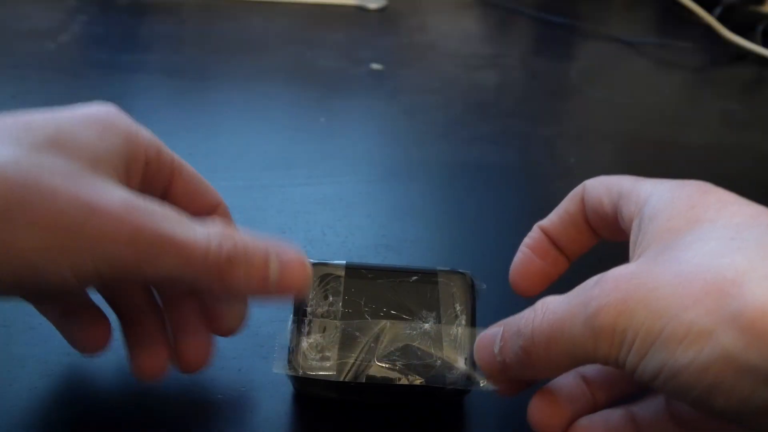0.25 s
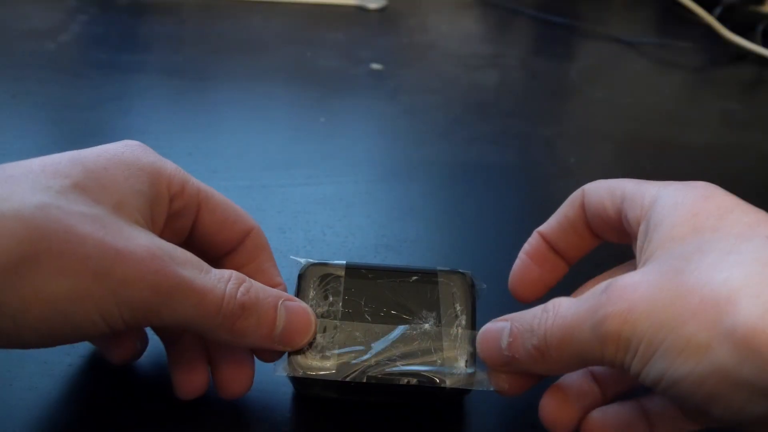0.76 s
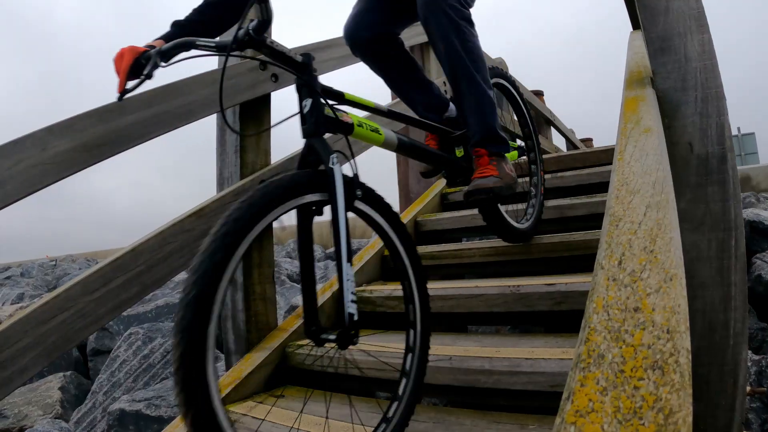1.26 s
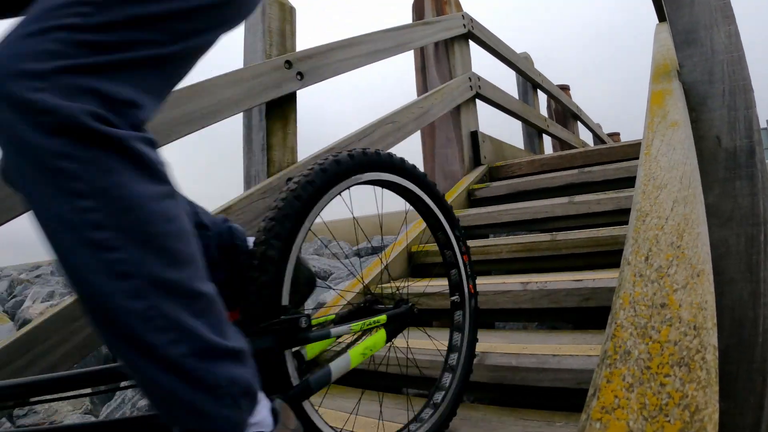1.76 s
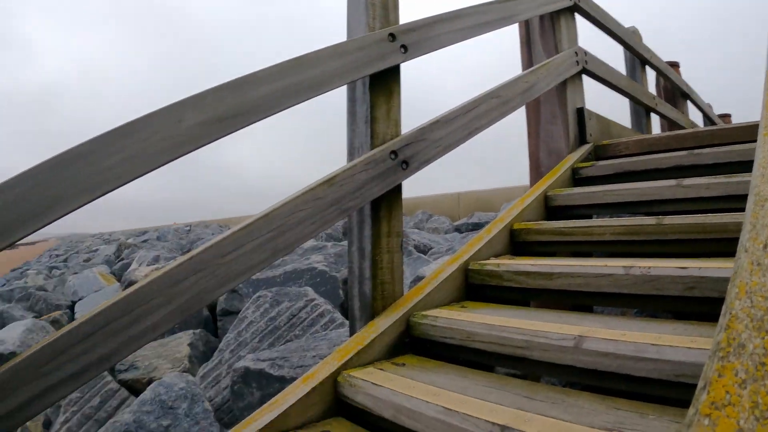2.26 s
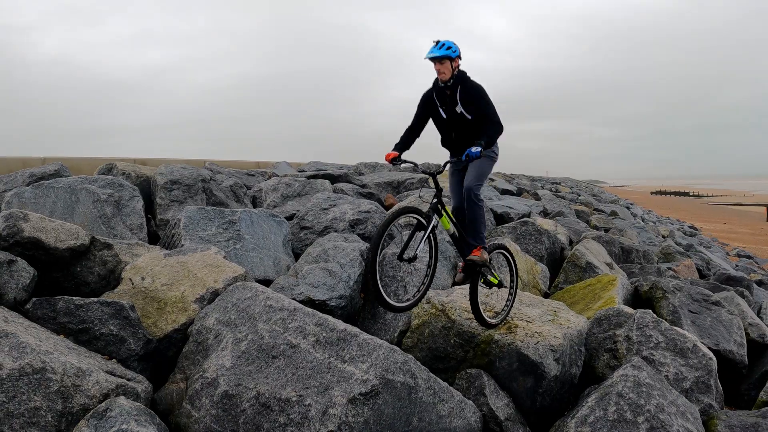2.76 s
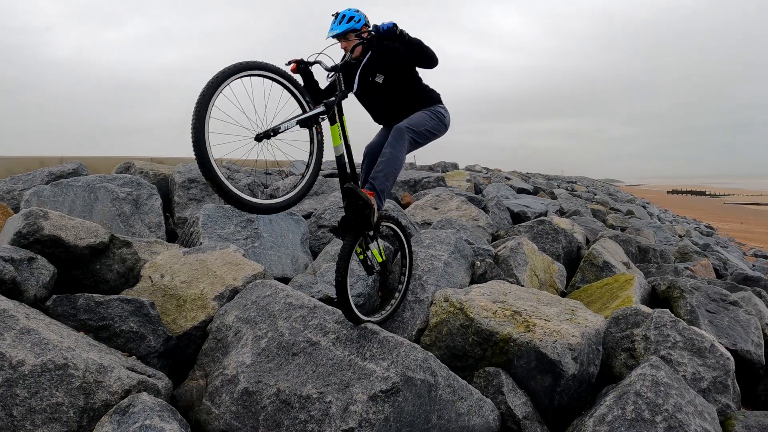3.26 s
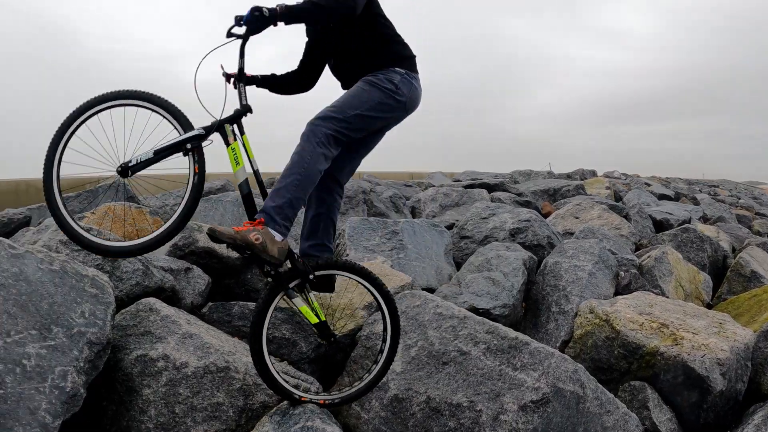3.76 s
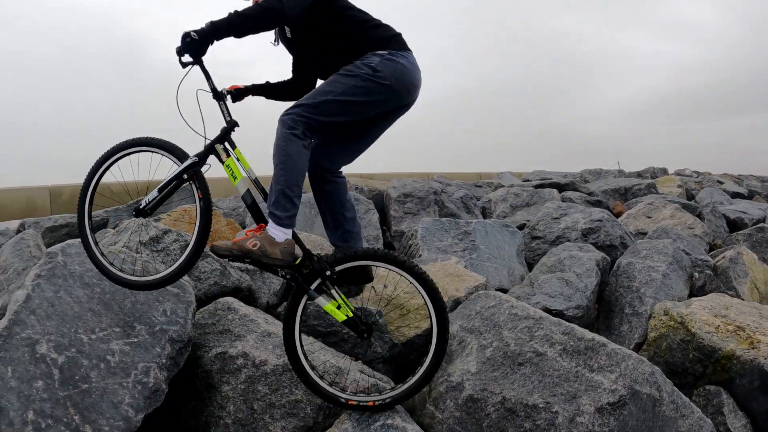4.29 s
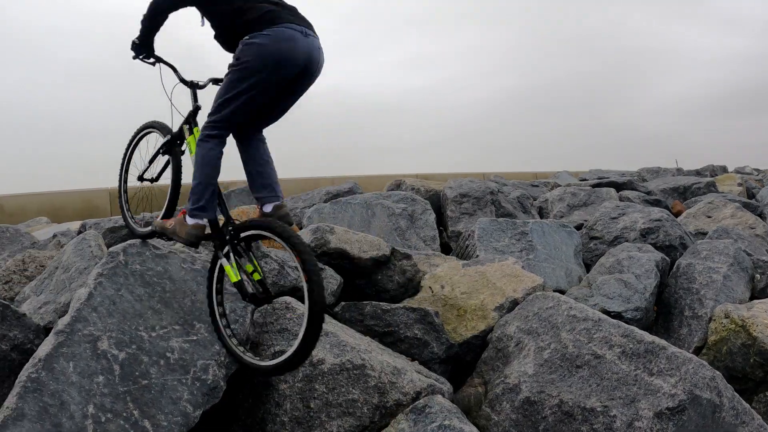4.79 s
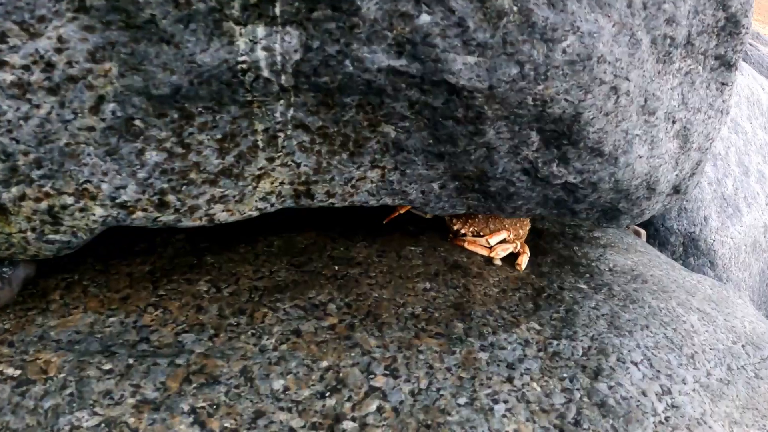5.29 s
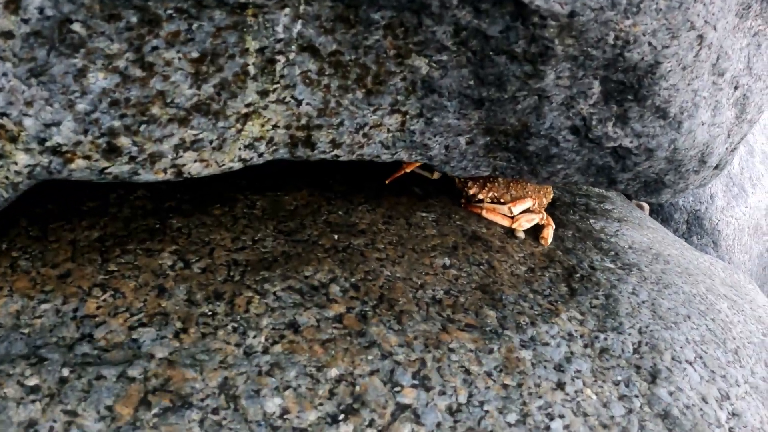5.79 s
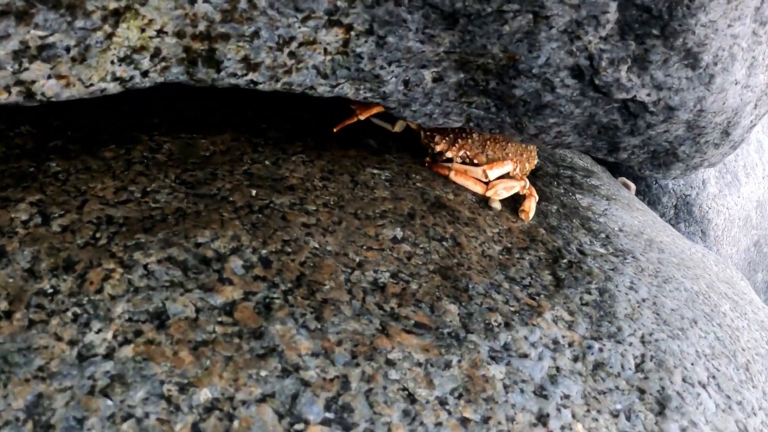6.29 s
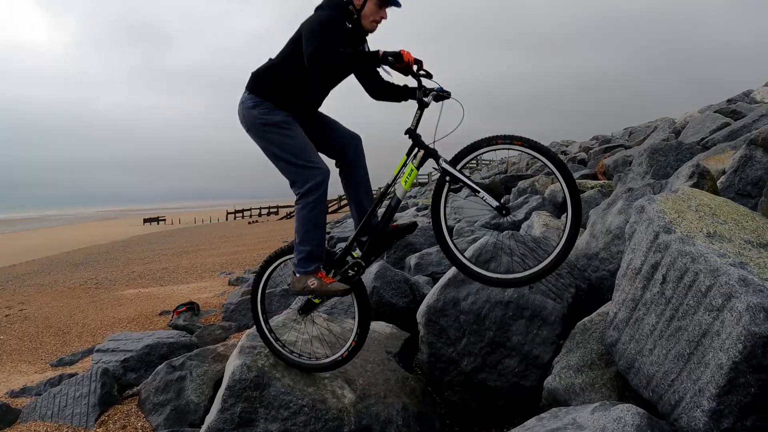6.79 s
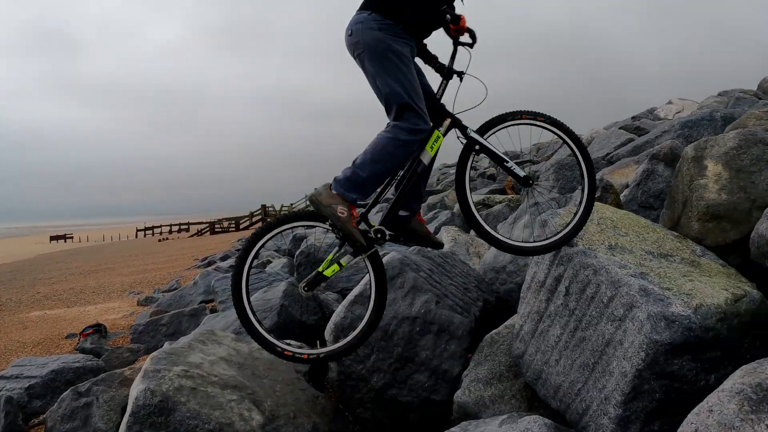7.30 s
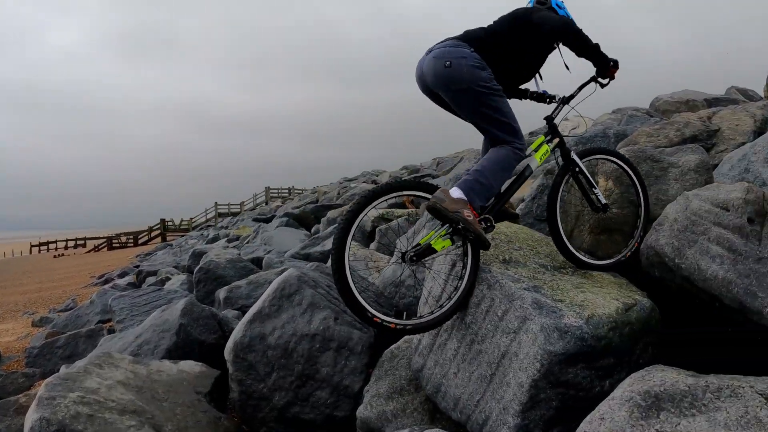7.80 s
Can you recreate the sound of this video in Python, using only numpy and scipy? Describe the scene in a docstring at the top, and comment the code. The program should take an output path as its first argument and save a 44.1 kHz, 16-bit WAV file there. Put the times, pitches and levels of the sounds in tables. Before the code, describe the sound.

In a quiet room, plastic film gives a few tiny snaps and a small case bumps a desk. Abruptly outdoors, a bike bumps down hollow wooden steps with short honking brake squeals. It then hops across boulders with tyre knocks, chain clanks and freehub buzzes while wind buffets the close microphone. A quieter crevice follows with brief handling bumps, then more brake honks and clanks over distant surf.

```python
"""A trials bike rolls down wooden beach steps and hops over boulders, after fingers pick at plastic film and bump a
small case on a desk. The rim brakes honk as stacks of sine overtones, and the freed rim rings in its own modes.
Tyres, chain, film and bumps are bursts of coloured noise; the freehub is noise pulsed by its clicks.
The steps boom through resonances. Shaped noise makes the wind on the microphone and the air with distant surf."""
import sys
import numpy as np
from scipy import signal
from scipy.fft import rfft, irfft, next_fast_len
from scipy.io import wavfile

SR = 44100
rng = np.random.default_rng(int(sys.argv[2]) if len(sys.argv) > 2 else 0)


def unload_audio(sound):
    """Save the sound as a 16-bit wav file, at the path given as the first command line argument."""
    columns = np.transpose(np.atleast_2d(sound))
    # keep every value between -1 and 1, then stretch to whole-number steps
    steps = np.round(np.clip(columns, -1, 1) * 32767)
    wavfile.write(sys.argv[1], SR, steps.astype(np.int16))


N = 355005
T = np.arange(N) / SR   # time of every sample in seconds

# Brake grabs. Each row: start in seconds, length in seconds, first pitch in Hz, last pitch in Hz, relative level in dB,
# octave in dB, treble in dB, roughness (0 is smooth, 1 or more is very rough).
GRABS = [(1.089, 0.045, 1095, 1065, -13.5, -12, -18.5, 0), (1.132, 0.028, 1093, 1023, -21, -8, -19, 0),
         (1.439, 0.042, 1166, 1136, -10.5, -19, -22.5, 0.05),
         (1.622, 0.038, 1134, 1147, -10, -22, -25.5, 0.04), (1.791, 0.03, 1168, 1090, -13, -10.5, -18, 0.2),
         (1.825, 0.037, 1128, 1174, -21.5, -1, -15, 0), (1.97, 0.025, 1149, 1147, -16, -12.5, -20, 0.4),
         (1.99, 0.0714, 1089, 1030, -16, -7.5, -13.5, 0.23),
         (2.054, 0.023, 830, 762, -14.5, -2.5, -8.5, 0.16), (2.17, 0.047, 1042, 1051, -15, -12.5, -15, .52),
         (2.919, 0.03, 896, 688, -29, 4.5, -4.5, 0.96),
         (3.198, 0.031, 1035, 1049, -18.5, -5.5, -17.5, 0.73),
         (3.234, 0.0472, 1073, 1152, -25, -9.5, -18, 0.77),
         (3.551, 0.013, 1236, 1195, -20.5, -6.5, -32, 0.9), (3.556, 0.031, 848, 797, -38.5, 17, -0.5, 1.23),
         (3.748, 0.023, 859, 798, -24.5, 2.5, -12, 1.26),
         (3.759, 0.023, 1047, 1020, -17, -3.5, -11.5, 0.32),
         (4.635, 0.0538, 1010, 911, -15.5, -6, -12.5, 0.28),
         (5.015, .046, 1216, 1160, -27, 3.5, -8.5, 0.12), (7.125, 0.052, 1035, 972, -14, -9, -12, 0.4),
         (7.184, 0.041, 849, 733, -21.5, 5.5, -13, 1),
         (7.258, 0.026, 1018, 1004, -14.5, -10.5, -13.5, 0.56),
         (7.481, 0.079, 1176, 1122, -18.5, -1, -0.5, 0.18), (7.622, 0.029, 1130, 1199, -21, 0, -2, 0.4)]
# Ways the wheel rim rings. Each row: pitch in Hz, relative level in dB, time to fall 60 dB when free in seconds.
RIM_MODES = [(1085.4, 1, 0.56), (1191, 12.5, 0.24), (1490, -26, 0.093), (1967, 2, 0.49), (2070, -9, 0.45),
             (2400, -29, .22)]
# Spectrum of tyres on the ground. Each row: frequency in Hz, relative level in dB.
TYRE_COLOUR = [(150, -54), (250, -12.5), (646, 4.5), (1220, 1), (1380, 2), (4100, -12), (4870, -14.5),
               (11000, -43.5), (12200, -53), (15500, -62)]


def from_db(db):
    """Turn decibels into a gain."""
    return 10 ** (np.asarray(db) / 20)


def rms_one(x):
    """Scale a sound to unit power."""
    return x / np.sqrt(np.mean(x ** 2) + 1e-20)


def add(out, start, x):
    """Mix x into out from a start time in seconds."""
    i = int(start * SR)
    out[i:i + len(x)] += x[:N - i]


def in_time(rows):
    """Draw lines through a table whose first column is time: one curve for each other column."""
    seconds, *columns = np.transpose(rows)
    return [np.interp(T, seconds, column) for column in columns]


def between(start, end, fade_s=0.006):
    """One from start to end, zero elsewhere, with short fades."""
    return np.clip(np.minimum(T - start, end - T) / fade_s + 0.5, 0, 1)


def drift(rate, size):
    """A random wandering line that heads for a new value rate times a second."""
    knots = rng.standard_normal(size // 8 + 4)
    return np.interp(np.arange(size) * rate / SR, np.arange(len(knots)), knots)


def colour(x, points, treble_db=0):
    """Give x a spectrum, tilted by treble_db per tenfold frequency, at unit power."""
    size = next_fast_len(len(x))
    log_hz = np.log10(np.fft.rfftfreq(size, 1 / SR) + 1)
    hz, db = np.transpose(points)
    below = np.maximum(np.log10(hz[0]) - log_hz, 0)
    above = np.maximum(log_hz - np.log10(hz[-1]), 0)
    curve_db = np.interp(log_hz, np.log10(hz), db) + treble_db * log_hz
    gain = from_db(curve_db - 60 * (below + above))   # extra fall beyond the ends of the table
    return rms_one(irfft(rfft(x, size) * gain, size)[:len(x)])


def grit(size, spread_db):
    """Noise of uneven strength, like dense tiny contacts."""
    return rng.standard_normal(size) * from_db(spread_db * drift(2500, size))


def resonate(x, modes):
    """Ring x through side-by-side resonances, each with its pitch, peak gain and decay time."""
    out = 0
    for hz, db, t60 in modes:
        r = from_db(-60 / (t60 * SR))   # loss per sample
        feedback = [1, -2 * r * np.cos(2 * np.pi * hz / SR), r * r]
        # the tiny offset keeps silence from slowing the filter
        out = out + from_db(db) * signal.lfilter([1 - r, 0, r - 1], feedback, x + 1e-18)
    return out


def swell(t, length, rise, fall):
    """A contact that tightens and lets go smoothly; rise and fall are shares of its length."""
    tighten = np.clip(t / (rise * length), 0, 1)
    let_go = np.clip((length - t) / (fall * length) + 0.63, 0, 1)
    return np.sin(np.pi / 2 * tighten * let_go) ** 2


def stick_slip(hz, grip, rough, octave_db, treble_db, flutter_db=5.0, steepening=0.85, bite=1.0, count=12):
    """A pad catches and slips on the rim; rough grabs waver in pitch and strength."""
    # Spectrum of the overtones. Each row: frequency in Hz, relative level in dB.
    overtone_colour = [(2800, 0), (3400, -1.5), (4600, -5.5), (5800, -10.5), (7000, -11.5), (8200, -14.5),
                       (9200, -12.5), (10500, -32), (15000, -44)]
    size, orders = len(hz), np.arange(3, count + 1)
    hz = hz * (1 + 0.055 * rough * drift(900, size) + 0.004 * drift(120, size))
    phase = 2 * np.pi * np.cumsum(hz) / SR
    # negative treble takes most from the highest overtones
    tilt_db = treble_db * (1 + steepening * np.log2(orders / orders[0]))
    overtones_db = np.interp(orders * hz.mean(), *np.transpose(overtone_colour)) + tilt_db
    out = 0
    for k, db in enumerate([0, octave_db, *overtones_db], 1):
        slow_share = 0.8 if k > 1 else 0.25
        sway_db = flutter_db * (rough * drift(252, size) + slow_share * drift(72.6, size))
        # overtones come in only once the pad bites
        strength = grip ** (1 + bite * np.log(k)) * from_db(db + sway_db)
        out = out + strength * np.sin(k * phase + rng.uniform(0, 2 * np.pi))
    return np.sqrt(2) * out


def brakes(rise=0.2, fall=0.47, lower_ratio=0.81, rub_db=-5, rub_tail_s=0.021, ring_db=-3, damped_share=0.7):
    """Two pad modes compete in each grab, over the rub of rubber; the rim rings on, damped by the pads."""
    # Roughness wakes the lower pad mode. Each row: roughness, relative level in dB.
    lower_mode = [(.14, -37.5), (.3, -12), (.52, -7), (1, -16)]
    # Spectrum of rubbing rubber. Each row: frequency in Hz, relative level in dB.
    rub_colour = [(450, -30), (750, 4), (1450, -5.5), (2000, -5), (4000, -9), (8000, -28.5), (15000, -60)]
    out, t = np.zeros(N), np.arange(SR // 6) / SR
    for start, length, first_hz, last_hz, db, octave_db, treble_db, rough in GRABS:
        hz = np.interp(t, [0, length], [first_hz, last_hz])
        grip = swell(t, length, rise, fall)
        honk = stick_slip(hz, grip, rough, octave_db, treble_db)
        lower_gain = from_db(np.interp(rough, *np.transpose(lower_mode)))
        lower = lower_gain * stick_slip(hz * lower_ratio, grip, rough, octave_db, treble_db + 1)
        sliding = (1 - np.exp(-t / 0.0016)) * np.exp(-np.maximum(t - length / 2, 0) / rub_tail_s)
        rub = rough * from_db(rub_db) * sliding * colour(grit(len(t), spread_db=3.5), rub_colour)
        add(out, start, from_db(db - 3.0) * (honk + lower + rub))
    damped_modes = [(hz, db, t60 * damped_share) for hz, db, t60 in RIM_MODES]
    return out + from_db(ring_db) * resonate(out, damped_modes)


def rim_ringing():
    """As the pads let go, the freed rim dies away in its own modes."""
    # Each row: start in seconds, relative level in dB, boost of the high modes in dB per octave.
    releases = [(3.782, -36, 2.5), (4.692, -42, 3), (7.292, -38, 4)]
    out, t = np.zeros(N), np.arange(SR // 2) / SR
    for start, db, high_db in releases:
        for hz, mode_db, t60 in RIM_MODES:
            boost_db = high_db * np.log2(hz / RIM_MODES[0][0])
            level_db = db + mode_db + boost_db - 60 * t / t60
            add(out, start, from_db(level_db) * np.sin(2 * np.pi * hz * t))
    return out


def blows(rows, spectrum, level_db, crack, crack_s, rise_s, spread_db):
    """Each blow is a short crack and a dying shiver of small contacts."""
    out, t = np.zeros(N), np.arange(SR // 3) / SR
    for start, db, treble_db, t60 in rows:
        dying = from_db(-60 * t / t60)
        shape = (1 - np.exp(-t / rise_s)) * (dying + crack * np.exp(-t / crack_s))
        contacts = colour(grit(len(t), spread_db), spectrum, treble_db)
        add(out, start - rise_s, from_db(db + level_db) * shape * contacts)
    return out


def scrapes(rows, spectrum, spread_db, chatter_db):
    """Gritty rubbing that chatters as it slides."""
    out, t = np.zeros(N), np.arange(SR // 5) / SR
    for start, length, db, treble_db in rows:
        chatter = from_db(chatter_db * drift(184, len(t)))
        grains = colour(grit(len(t), spread_db) * chatter, spectrum, treble_db)
        add(out, start, from_db(db) * swell(t, length, rise=0.028, fall=0.33) * grains)
    return out


def tyre_blows(landing_t60_s=0.12, knock_db=3, knock_growth=1.52, knock_t60_s=0.059):
    """Tyres thud as they land, and knock wherever a brake grab stops the wheel."""
    # Each row: start in seconds, relative level in dB, treble tilt in dB.
    landings = [(1.032, -20.5, -24), (1.204, -20, -2), (1.26, -19.5, 7), (1.421, -19.5, -15),
                (1.61, -21, 14), (1.74, -33, 28), (2.324, -28, 31), (2.766, -21, 5.5), (4.966, -10.5, 3),
                (7.683, -24.5, 18)]
    rows = [(*landing, landing_t60_s) for landing in landings]
    for start, _, _, _, grab_db, *_ in GRABS:
        rows.append((start, knock_db + knock_growth * grab_db, 0, knock_t60_s))
    return blows(rows, TYRE_COLOUR, level_db=-7.0, crack=0.41, crack_s=0.0064, rise_s=0.0018, spread_db=2.5)


def tyre_slides(lead_s=0.004, scuff_s=0.036, scuff_db=-28.5, scuff_treble_db=7):
    """Tyres skid, and scuff just before each grab, as strongly as the grab is rough."""
    # Each row: start in seconds, length in seconds, level in dB, treble tilt in dB.
    skids = [(2.152, 0.029, -27.5, 0), (2.268, 0.059, -27.5, 17.5), (2.396, 0.025, -24.5, 5.5),
             (4.685, 0.088, -36.5, -4), (4.902, 0.026, -30, 8), (5.222, 0.0056, -27, -9),
             (7.555, 0.12, -28, 16)]
    scuffs = []
    for start, *_, rough in GRABS:
        rough_db = 20 * np.log10(abs(rough) + 1e-9)
        scuffs.append((start - lead_s, scuff_s, scuff_db + rough_db, scuff_treble_db))
    return scrapes(skids + scuffs, TYRE_COLOUR, spread_db=4.5, chatter_db=4.0)


def ratchet_ticks(first_s=2.56, tooth_s=0.0295, count=5):
    """The pedal is wound back over five ratchet teeth, which tick evenly."""
    # level in dB, treble tilt in dB, time to fall 60 dB in seconds
    return [(first_s + k * tooth_s, -28, 4, 0.085) for k in range(count)]


def metal_blows(rebound_s=0.036, rebound_db=-26.5, rebound_share=0.22, loss_db=13):
    """Chain and frame clank, the chain rebounds softly twice after each clank, and the ratchet ticks."""
    # Each row: start in seconds, relative level in dB, treble tilt in dB.
    clanks = [(3.2693, -19, -8), (3.473, -31, 11), (3.856, -7.5, -7), (3.943, -18, -12),
              (4.0576, -13.5, -14), (4.146, -18, -7), (4.1768, -24.5, -14), (4.358, -17.5, -3),
              (4.407, -8.5, -18), (4.5031, -23.5, 2), (4.55, -16, 6), (4.671, -11, -3), (4.9906, -7.5, 5),
              (6.8444, -24.5, -8), (6.8744, -10.5, -7.5), (6.9182, -22, -34), (7.11, -36, -15),
              (7.2, -10, 3), (7.398, -30.5, 4), (7.9958, -35, 1)]
    # Soft clanks shiver on, hard ones snap. Each row: clank level in dB, time to fall 60 dB in seconds.
    shiver = [(-27.5, 0.52), (-21, 0.051), (-24, 0.079)]
    # Spectrum of chain and frame. Each row: frequency in Hz, relative level in dB.
    clank_colour = [(710, -9), (1200, -7), (1380, -39), (1650, -4.5), (2360, -3.5), (3390, -2.5),
                    (5310, -3.5), (7020, -13.5), (8700, -17.5), (11500, -31), (14100, -38), (15500, -56)]
    rows = ratchet_ticks()
    for start, db, treble_db in clanks:
        rows.append((start, db, treble_db, np.interp(db, *np.transpose(shiver))))
        delays = np.cumsum(rebound_s * rng.uniform(0.8, 1.1, size=2))
        for k, delay in enumerate(delays):
            soft_db = rebound_db + rebound_share * db - k * loss_db
            rows.append((start + delay, soft_db, 12, 0.053))
    rows = [row for row in rows if row[0] < T[-1]]
    return blows(rows, clank_colour, level_db=-12, crack=0.65, crack_s=0.00077, rise_s=0.00044, spread_db=0)


def freehub(level_db=7):
    """Pawls drop over the ratchet teeth in a fast, bright buzz."""
    # One table per pedal kick. Each row: time in seconds, relative level in dB, pawl clicks per second.
    kicks = [
        [(2.96, -61, 180), (3.122, -41.5, 96), (3.34, -59.5, 530)],
        [(3.58, -52.5, 190), (3.71, -43.5, 180), (3.86, -55, 240)],
        [(4.7, -55.5, 120), (4.926, -45.5, 81), (5.08, -50, 134)],
    ]
    # Spectrum of the pawls. Each row: frequency in Hz, relative level in dB.
    pawl_colour = [(1470, -19), (2500, -10), (3020, -10), (3400, -11.5), (5530, -8.5), (7810, -16.5),
                   (10300, -28), (13900, -60), (15000, -61)]
    out = np.zeros(N)
    for kick in kicks:
        db, per_s = in_time(kick)
        turns = np.cumsum(per_s * (1 + 0.08 * drift(34, N)) / SR)
        since_click = turns % 1 / per_s
        clicks = np.exp(-since_click / 0.0016) + 0.27   # a little noise stays between clicks
        spinning = between(kick[0][0], kick[-1][0], fade_s=0.04)
        out += spinning * from_db(db + level_db) * colour(clicks * rng.standard_normal(N), pawl_colour)
    return out


def stairs(tread_db=12, boom_db=-3, clatter_db=2.5, jolt_db=6.0):
    """Knobbly tyres scrub over the steps and set the planks booming."""
    # Each row: time in seconds, relative level of tread and rattle in dB, relative level of the planks' boom in dB.
    ride = [(1.03, -45, -29), (1.246, -50.5, -21), (1.664, -50, -28.5), (2.036, -38.5, -23),
            (2.23, -52, -35), (2.42, -61, -15.5)]
    # Spectrum of the tread. Each row: frequency in Hz, relative level in dB.
    tread_colour = [(150, -27), (250, -24), (341, -0.5), (768, 1), (882, 4), (1160, 6), (1510, -3.5),
                    (3700, -5.5), (8920, -20), (11200, -39.5), (12600, -42.5), (15500, -48)]
    # Resonances of the planks. Each row: pitch in Hz, relative level in dB, time to fall 60 dB in seconds.
    plank_modes = [(87.5, -31, 0.27), (114, 14, 0.32), (160, -28, 0.36)]
    rattle, boom = in_time(ride)
    knobs = from_db(clatter_db * drift(90, N) + jolt_db * drift(21.65, N))
    tread = from_db(rattle + tread_db) * colour(grit(N, spread_db=3) * knobs, tread_colour)
    planks = from_db(boom + boom_db) * rms_one(resonate(rng.standard_normal(N) * knobs, plank_modes))
    return between(1.025, 2.425) * (tread + planks)


def rocks(x, echo_db=-19, fade_s=0.048):
    """Short scattered echoes from the boulders, made by a burst of fading noise."""
    t = np.arange(SR // 3) / SR
    scatter = colour(grit(len(t), spread_db=7.5), [(100, -5), (2500, 10), (12000, -17.0)])
    scatter = scatter * np.exp(-t / fade_s) * (t > 0.006)   # the first echo comes after 6 ms
    return x + from_db(echo_db) * signal.fftconvolve(x, scatter / np.linalg.norm(scatter))[:N]


def film_snaps():
    """Picked plastic film snaps with a sharp crack and a brief rustle."""
    # Each row: start in seconds, relative level in dB, treble tilt in dB, time to fall 60 dB in seconds.
    snaps = [(0.326, -20, -5, 0.032), (0.3483, -18.5, -16, 0.025), (0.5566, -32, 20, 0.017),
             (0.7245, -27.5, -14, 0.039), (0.836, -26, 16, 0.036)]
    # Spectrum of the film. Each row: frequency in Hz, relative level in dB.
    snap_colour = [(590, -18), (1000, -10), (2830, -12), (3480, -2.5), (5920, -5), (11300, -12.5),
                   (14400, -21), (15800, -16)]
    return blows(snaps, snap_colour, level_db=-14.5, crack=3.3, crack_s=0.0006, rise_s=0.0001, spread_db=0)


def dull_bumps():
    """Desk, steps and ground thump with low noise that dies away."""
    # Each row: start in seconds, relative level in dB, treble tilt in dB, time to fall 60 dB in seconds.
    bumps = [(0.497, -10, 5.5, .14), (1.214, -14.5, 0, 0.22), (1.236, -19.5, 7.5, 0.36),
             (1.432, -15.5, -29, 0.15), (1.61, -10.5, -19, 0.12), (1.963, -13, -23, 0.098),
             (2.108, -18, -10, 0.17), (2.294, -13, 29, 0.13), (2.427, -6, -0.5, 0.3),
             (3.44, -16, -15, 0.32), (3.499, -11, -10, 0.12), (4.407, -16.5, 3, .14),
             (4.968, -24, 0, 0.035), (6.237, -10.5, -5, 0.047), (6.274, -20.5, 9, 0.33),
             (7.685, -9, -1, 0.042)]
    # Spectrum of the bumps. Each row: frequency in Hz, relative level in dB.
    bump_colour = [(40, -15), (100, 9.5), (280, -2), (450, -4.5), (850, -15), (1150, -26.5), (2000, -74)]
    return blows(bumps, bump_colour, level_db=-4.5, crack=0.043, crack_s=0.012, rise_s=0.0015, spread_db=1)


def handling():
    """A hand rubs on the microphone housing."""
    # Each row: start in seconds, length in seconds, level in dB, treble tilt in dB.
    rubs = [(6.232, 0.13, -45.5, 4), (6.285, 0.024, -32.5, -2), (6.38, 0.079, -40.5, -1)]
    # Spectrum of the housing. Each row: frequency in Hz, relative level in dB.
    housing_colour = [(800, 1), (1400, 1), (2600, -1), (3600, -0.5), (5500, -13), (6900, -6.5),
                      (7500, -21.5), (15000, -49)]
    return scrapes(rubs, housing_colour, spread_db=0.0, chatter_db=1.5)


def wind(rumble_db=1, flutter_db=0, lumpy_db=4.0, hollow_db=-36, far_db=-9):
    """Eddies rumble and flutter on the microphone port; a hollow drone sounds among the boulders."""
    # Three stretches in turn. Each row: time in seconds, relative rumble in dB, relative flutter in dB.
    gusts = [
        [(1.03, -35.5, -35), (2.156, -34, -50.5), (2.41, -44, -46)],
        [(2.43, -19.5, -25.5), (2.86, -21, -26), (2.94, -26.5, -45), (3.08, -20.5, -45), (3.13, -37, -51),
         (3.21, -23, -35), (3.41, -45, -42.5), (3.45, -22, -19.5), (3.6, -26.5, -36.5), (4.07, -46.5, -45.5),
         (4.35, -24, -29), (4.92, -39, -50), (4.97, -25.5, -32), (5.22, -37.5, -48)],
        [(5.23, -39.5, -45.5), (6.64, -38, -36.5), (6.67, -31.5, -43), (6.78, -46, -38), (7.64, -41.5, -51),
         (7.68, -31, -31), (7.81, -51, -55), (8.05, -44, -64)],
    ]
    # Spectra of both parts. Each row: frequency in Hz, relative level in dB.
    rumble_colour = [(8.8, -28), (15, 5), (50, 4.5), (113, -2.5), (146, -17.5), (180, -14), (230, -35.5),
                     (400, -120)]
    flutter_colour = [(80, -6), (150, 2), (230, -3), (400, -11), (700, -14.5), (1400, -33), (4000, -57.5)]
    # Resonances of the drone. Each row: pitch in Hz, relative level in dB, time to fall 60 dB in seconds.
    hollow_modes = [(173.5, 8.5, 0.044), (220.6, 9, 0.076), (252.4, 4.5, 0.04)]
    low, high = in_time(np.vstack(gusts))
    eddies = lumpy_db * drift(35, N)
    rumble = from_db(low + rumble_db) * colour(rng.standard_normal(N), rumble_colour)
    flutter = from_db(high + flutter_db + eddies) * colour(rng.standard_normal(N), flutter_colour)
    # ringing twice makes the pitches stand out more
    hollow = resonate(resonate(rng.standard_normal(N), hollow_modes), hollow_modes)
    drone = from_db(hollow_db) * rms_one(hollow)
    near_then_far = between(5.25, 7.15) + from_db(far_db) * between(7.15, 8.1)
    return between(1.025, 8.1) * (rumble + flutter) + near_then_far * drone


def air():
    """Steady noise of each place in turn: rumble and hiss indoors, then the beach, a crevice and far surf."""
    # Each row: start in seconds, end in seconds.
    places = [(0, 1.025), (1.025, 5.23), (5.23, 6.82), (6.82, 8.1)]
    # One level in dB per place.
    air_db = [-44, -40.5, -43, -45]
    # Spectrum of each place. Each row: frequency in Hz, relative level in dB.
    room = [(25, -4), (60, -1), (110, -8), (200, -16.5), (320, -10.5), (560, -22.5), (820, -13.5),
            (906, -8.5), (1100, -18), (1700, -19), (2900, -19.5), (4300, -28.5), (8000, -41), (15500, -48)]
    beach = [(250, -12.5), (400, -7.5), (900, -6.5), (1450, -10.5), (2500, -18.5), (4600, -30),
             (9000, -46.5), (14000, -63)]
    crevice = [(210, -30), (350, -28), (477, -3.5), (1800, -12.5), (2030, -18.5), (3890, -26.5),
               (14000, -72.5)]
    surf = [(300, 0), (600, 8.5), (1200, 6), (2500, -7), (5000, -20.5), (9000, -31), (14000, -58)]
    out = np.zeros(N)
    for (start, end), db, spectrum in zip(places, air_db, [room, beach, crevice, surf]):
        out += between(start, end) * from_db(db) * colour(rng.standard_normal(N), spectrum)
    return out


def scene():
    """Bike, desk, wind and air in one channel."""
    echoing = brakes() + rim_ringing() + tyre_blows() + tyre_slides() + metal_blows() + freehub()
    bike = rocks(echoing) + stairs()
    return (bike + film_snaps() + dull_bumps() + handling() + wind() + air())[None]


def record(dry):
    """Round off the peaks and cut the top of the treble."""
    rounded = 0.8 * np.tanh(dry / 0.8)
    low_pass = signal.butter(16, 15800, fs=SR, output="sos")   # cutoff in Hz
    return signal.sosfiltfilt(low_pass, rounded)


dry = scene()
out = record(dry)
unload_audio(out)
```